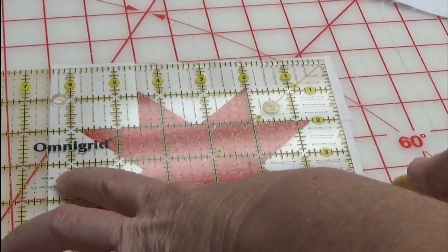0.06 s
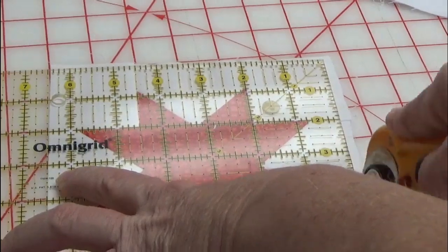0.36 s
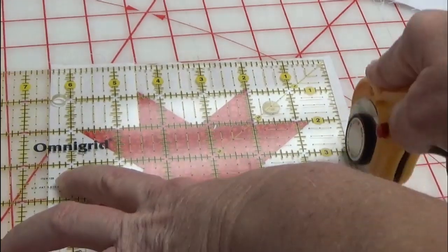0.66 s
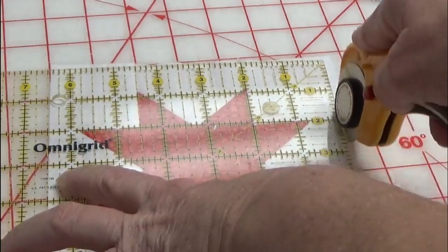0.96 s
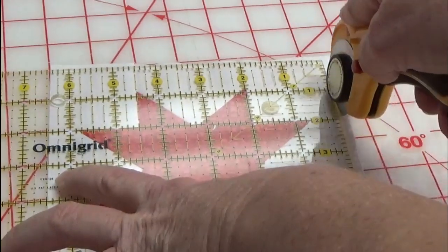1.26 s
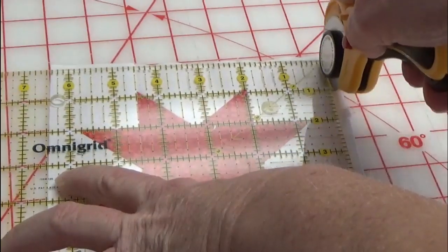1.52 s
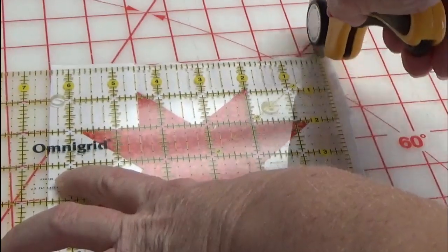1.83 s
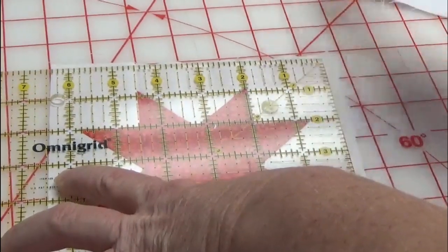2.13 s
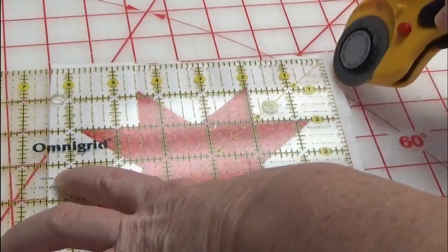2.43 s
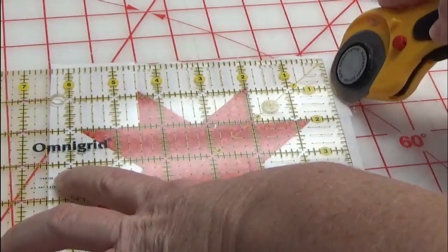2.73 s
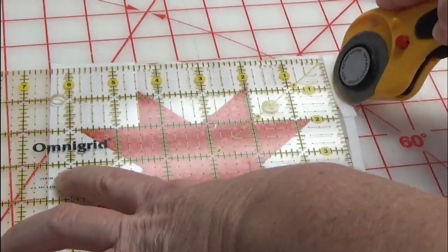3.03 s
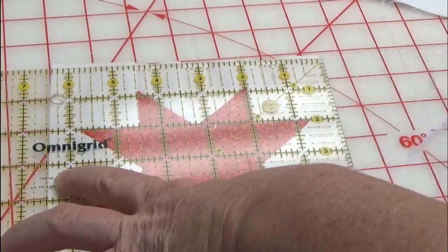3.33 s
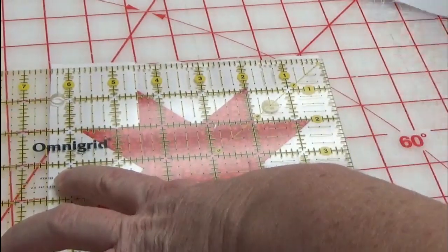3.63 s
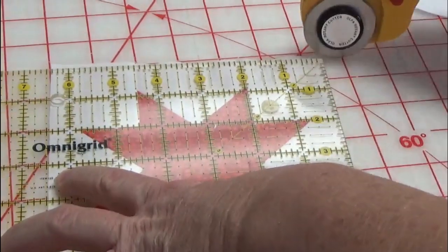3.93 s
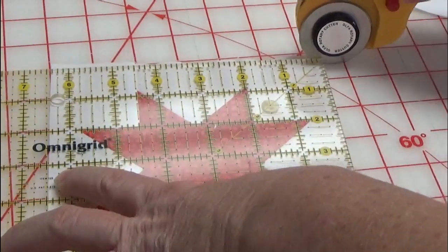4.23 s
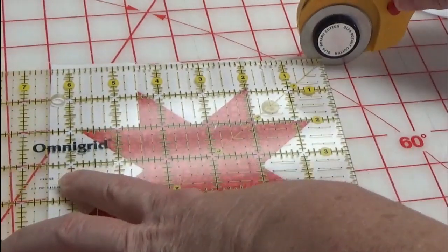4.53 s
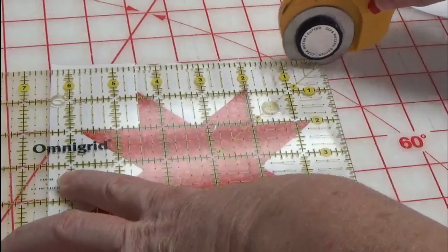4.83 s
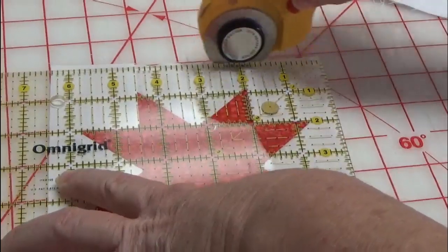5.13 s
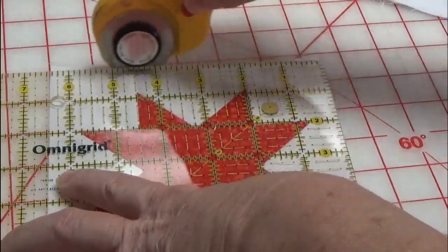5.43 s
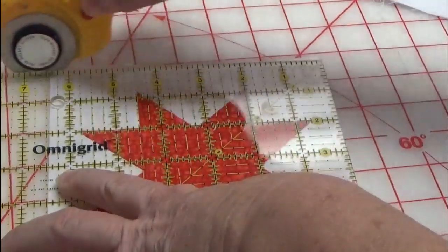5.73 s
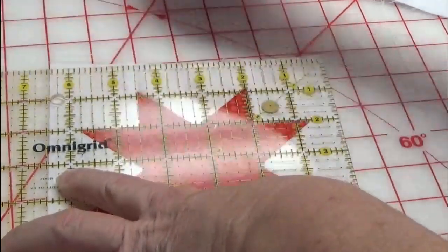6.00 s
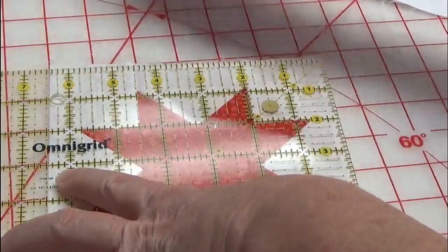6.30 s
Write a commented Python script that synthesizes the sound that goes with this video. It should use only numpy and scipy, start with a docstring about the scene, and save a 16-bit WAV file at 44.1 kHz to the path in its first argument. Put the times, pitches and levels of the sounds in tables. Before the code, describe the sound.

Close by in a quiet little room, a rolling blade makes short, crackly cuts through cloth on a mat and rolls out with a soft thud. The offcut rustles away, the cutter clicks once, and a focus motor ticks faintly in the gaps. A second, continuous cut follows with a few crisp snaps. It ends with the loudest sound, the plastic tool knocking and rattling as it is put down.

```python
"""A rotary cutter trims a quilt block along an acrylic ruler on a mat, in a small quiet room.
First the blade crunches up one side in short pushes, each breaking thread a tiny impulse, and rolls out.
A camera's focus motor ticks faintly in the pauses. The offcut is swept away with a rustle of friction,
the cutter ticks as it is turned, and a fingertip judders on the ruler. One long stroke runs along the top.
Last, the plastic cutter is put down with a clatter that excites the modes of handle and table."""
import sys
import numpy as np
from scipy import signal
from scipy.fft import rfft, irfft, next_fast_len
from scipy.io import wavfile

SR = 44100
rng = np.random.default_rng(int(sys.argv[2]) if len(sys.argv) > 2 else 0)


def store_pcm(level_fs):
    """Save levels as 16-bit WAV."""
    pcm = np.round(np.clip(level_fs, -1, 1) * 32767).astype(np.int16)
    wavfile.write(sys.argv[1], SR, np.atleast_2d(pcm).T)


N = 280476
TIME = np.arange(N) / SR
LEFT_RIGHT = np.array([[1], [-1]])
ATTACK_S, RELEASE_S = 0.031, 0.011  # rise and decay of a rubbing contact

# Levels are relative, before the mix. Spectrum of the room's noise, and its hum: f/Hz, level/dB
AIR_SPECTRUM = [(13, -45), (22, -4), (64, -6.5), (90, -2), (122, -10), (147, -2), (289, -2), (461, -4),
                (525, -8.5), (568, -5), (614, -8), (2080, -13.5), (2310, -14.5), (8480, -20.5),
                (11000, -25.5), (14300, -107), (22000, -120)]
HUM_PARTIALS = [(60, -76), (119, -73.5), (286, -72.5)]
# pushes of the blade: t/s, duration/s, level/dB, mat rumble/dB re crunch, stretch of the ruler
BLADE_PUSHES = [(-0.04, 0.023, -51, 1.5, "near"), (0.081, 0.081, -44, -6.5, "near"),
                (0.191, 0.078, -39.5, -7.5, "near"), (0.265, 0.095, -44.5, -12.5, "near"),
                (0.454, 0.07, -41.5, -3.5, "near"), (0.525, 0.45, -50, -2.5, "near"),
                (0.598, 0.15, -44, -4.5, "near"), (0.962, 0.043, -43, -1.5, "far"),
                (1.116, 0.083, -39.5, -5.5, "far"), (1.246, 0.16, -46.5, -3, "far"),
                (1.38, 0.26, -52, -6, "far"), (1.465, 0.086, -46.5, -3, "far"),
                (1.599, 0.13, -45.5, -6.5, "far"), (1.738, 0.065, -48, -2.5, "far"),
                (4.799, 0.11, -56, -0.5, "top"), (4.831, 0.15, -46.5, -6.5, "top"),
                (4.877, 0.12, -51, -3, "top"), (4.935, 0.22, -42.5, -2.5, "top"),
                (5.134, 0.31, -39.5, -3, "top"), (5.452, 0.079, -38, -17, "end"),
                (5.502, 0.27, -39, -6, "end")]
# thread bundles briefly change the load on the blade: t/s, gain/dB
THREAD_CATCHES = [(0.095, 5), (.223, -2), (0.329, 4), (0.46, 7), (0.487, 6.5), (0.716, 3.5), (0.83, 5),
                  (0.939, 4), (0.98, -3), (1.139, -3), (1.273, 1), (1.449, -1), (1.488, 4.5), (1.65, 6),
                  (1.717, 6), (4.962, 1), (5.038, 0), (5.296, 7)]
# spectra of the cut on each stretch: f/Hz, level/dB
NEAR_SPECTRUM = [(50, -38), (110, -28), (200, -3), (350, 2.5), (900, 4), (1600, 5), (2050, 2), (2600, -4),
                 (4300, -8), (5500, -15.5), (9300, -16.5), (11000, -26)]
FAR_SPECTRUM = [(50, -13), (110, -16), (200, -4.5), (320, -1.5), (560, -2.5), (900, 6.5), (1900, -2.5),
                (2700, -3), (4500, -9), (5800, -17), (9300, -14), (11000, -24)]
TOP_SPECTRUM = [(50, -52), (110, -26), (190, -6.5), (280, -1), (560, -11.5), (900, -6), (1600, 1.5),
                (2400, -6), (3600, -10.5), (6000, -14), (9500, -18), (11000, -24)]
# resonances of cutter, ruler and table on each stretch: f/Hz, bandwidth/Hz, gain/dB
NEAR_PEAKS = [(377, 31, 4), (498, 50, -15.5), (583, 74, 9), (652, 36, -17), (740, 75, 5), (980, 110, -2.5),
              (2340, 160, -2.5), (3170, 340, -10), (3550, 150, 6.5), (3590, 150, -4.5), (3920, 220, -5.5),
              (5000, 300, -4), (5770, 580, 2.5), (6900, 500, -4.5), (8300, 520, 2.5)]
FAR_PEAKS = [(273, 71, 1.5), (310, 42, 3.5), (380, 32.2, 3.5), (470, 19, 9), (830, 45, -10),
             (890, 140, 2.5), (1250, 120, -4), (1560, 110, 5), (2200, 360, 4), (3060, 300, -5.5),
             (5000, 1100, 3), (6520, 540, 6.5)]
TOP_PEAKS = [(263, 20, 2.5), (298, 32, 4), (321, 11, 2.5), (346, 42, -4), (460, 234, 12.5), (710, 78, 8.5),
             (900, 380, 10), (1030, 39, 0), (1350, 98, 2), (1486, 76, -8), (1870, 79, -6), (2050, 130, 2.5),
             (2820, 660, -2.5), (3150, 200, 5.5), (3580, 83, 3), (3870, 170, 4), (9700, 1400, 4)]
END_PEAKS = [(224, 92, 8), (325, 18, 16), (472, 32, 17), (665, 130, 10), (870, 190, 9.5), (1330, 110, 3.5),
             (1680, 87, -2), (1890, 150, -6.5), (3000, 360, 2), (4600, 130, 1), (6030, 380, -5),
             (6600, 250, 2)]
# the guard leans on the ruler: t/s, duration/s, first f/Hz, last f/Hz, level/dB re crunch
GUARD_GLIDES = [(0.09, 0.28, 1560, 1797, -6), (0.39, .36, 1790, 1960, -7), (0.94, 0.25, 1970, 1847, -7.5),
                (1.73, 0.066, 1680, 1680, -11), (5.08, .13, 2020, 2000, -5), (5.47, 0.4, 1530, 1500, -13)]
# blade and guard scrape ruler or mat: t/s, duration/s, f/Hz, bandwidth/Hz, level/dB
EDGE_SCRAPES = [(0.392, .05, 1820, 200, -58), (0.493, 0.038, 3930, 200, -41.5),
                (0.496, 0.046, 1842, 170, -39), (0.524, 0.0081, 1855, 168, -39),
                (0.616, 0.0044, 1900, 120, -35), (0.659, 0.034, 4720, 450, -49.5),
                (1.879, 0.03, 1230, 450, -51), (2.266, 0.013, 5300, 600, -60.5),
                (3.874, 0.0088, 2150, 200, -59), (3.874, .008, 3450, 400, -59),
                (5.4868, 0.0039, 1370, 299, -29), (5.507, 0.016, 1186, 700, -31),
                (5.509, 0.034, 4750, 900, -43)]
# seams and thick threads give way: t/s, level/dB
SEAM_SNAPS = [(0.484, -26.5), (0.661, -32), (1.717, -29.5), (5.257, -21), (5.484, -18.5), (5.748, -29)]
# the blade rolls on the bare mat: t/s, duration/s, level/dB
BARE_ROLLS = [(1.822, 0.71, -59.5), (5.845, 0.29, -61)]
# soft blows on the table: t/s, level/dB, damping by the hand/(dB/s)
TABLE_BLOWS = [(1.885, -37.5, 17), (2.066, -50, 60), (2.745, -45.5, 10), (4.085, -46.5, 110),
               (4.3936, -46, 100), (4.7603, -57, 60), (5.498, -36, 20), (6.151, -31, 10), (6.1671, -28, 8),
               (6.2972, -24.5, 8), (6.319, -33, 11)]
# the focus motor hunts: first t/s, last t/s, level/dB
MOTOR_RUNS = [(1.948, 3.03, -59.5), (3.917, 4.8, -60)]
# light contacts of blade and guard: t/s, level/dB, cutoff f/Hz
BLADE_TAPS = [(2.2634, -61, 9050), (4.2537, -25.5, 10900), (4.8546, -45, 8000)]
# blows on the handle: t/s, level/dB, cutoff f/Hz, clack/dB re shell, hollow/dB re shell, pitch ratio
HANDLE_BLOWS = [(2.75, -49, 8040, -2.5, -8, 1.05), (3.871, -51, 4500, -25, -15, 1),
                (4.223, -54, 3000, -25, 1, 1.07), (4.2263, -59, 3000, -15, 8, 1.12),
                (5.4986, -40, 1600, 7, -3, 1), (5.502, -33, 1700, -4, -5, .9),
                (5.5102, -34, 2000, 5, -2, 1), (5.859, -64, 597, 24, -12, .8),
                (5.865, -66, 500, 27, -12, .8), (5.8904, -36.5, 4470, -6, 7.5, 1),
                (5.9, -36, 4400, 0, -7, 1.1), (5.9428, -43.5, 7600, -13, -17, 1),
                (5.9756, -42, 6600, -10, -12, 0.96), (6.007, -42, 6900, -8, -10, 0.93),
                (6.045, -43, 5930, -10, -12, 0.92), (6.066, -45, 5000, -15, -2, 1),
                (6.1506, -26.5, 5500, 3, 1, 0.94), (6.1535, -25, 6500, 0, 3.5, 1.13),
                (6.2664, -15.5, 7900, -6.5, -8.5, 1.02), (6.2769, -24.5, 3000, -8, 4.5, 1.02),
                (6.282, -6, 6800, -22, -12.5, 0.99), (6.29, -19.5, 7060, -10, -8, 0.88)]
# normal modes of the struck bodies: f/Hz, level/dB, T60/s
TABLETOP_MODES = [(141.5, -10.5, 0.37), (190, -4.5, 0.22), (238.4, 1, 0.25), (292, 5, 0.1),
                  (319, -7.5, 0.12), (364, -4, 0.065), (468, -7.5, 0.2), (565, -11, 0.29), (704, -24, 0.18)]
CAMERA_MODES = [(1960, -11, 0.042), (2700, 10, 0.04), (3000, 2.5, 0.025), (3370, 6.5, 0.035)]
STEEL_MODES = [(1760, -13.5, 0.017), (2730, -11, 0.028), (4054, -5.5, 0.028), (5900, -8.5, 0.019),
               (7600, 3.5, 0.0024), (8060, 4, 0.0045), (10100, -0.5, 0.0038)]
SHELL_MODES = [(3150, 0.5, 0.005), (3190, -5.5, 0.02), (3457, -6.5, 0.021), (3900, 0.5, 0.0052),
               (4470, 5.5, 0.0049), (5250, -3.5, 0.015), (6120, 6, 0.0034), (8300, 2.5, 0.0027),
               (9050, 8.5, 0.0028)]
CAVITY_MODES = [(1407, -8.5, 0.034), (1574, -22, 0.097), (1612, 5.5, 0.023)]
SURFACE_MODES = [(295, -12, 0.031), (570, 0, 0.016), (800, 11.5, 0.0023), (1370, 9.5, 0.0023)]
# hand and cloth shift between strokes: t/s, duration/s, rub level/dB, hiss level/dB
HAND_MOVES = [(2.76, 0.072, -74, -63), (3.89, 0.044, -75, -59), (4.362, 0.12, -75, -71),
              (4.442, 0.39, -62, -78)]
# the offcut is pulled: t/s, duration/s, initial level/dB, growth/(dB/s)
OFFCUT_PULLS = [(3.068, 0.409, -53, 39), (3.413, 0.044, -36, 41)]
# the strip flaps as it tugs free: t/s, flutter gain/dB
STRIP_FLAPS = [(3.15, -1), (3.171, 2), (3.218, 6.5), (3.238, 7), (3.261, 6), (3.285, 7), (3.306, 7),
               (3.434, 4.5), (3.449, 6.5)]
# spectra of the offcut sliding slowly, sliding fast and fluttering: f/Hz, level/dB
DRAG_SPECTRUM = [(400, -16), (900, 6), (1300, -1.5), (1900, 6), (2400, 7), (2850, 4), (3600, 1.5),
                 (4400, 0), (5100, -5), (5600, -5.5), (7500, -3), (11000, -8.5)]
SWISH_SPECTRUM = [(400, -32), (800, 4), (1100, -2), (1700, -1), (2600, -2), (4200, -3.5), (7000, -4.5),
                  (11000, -14.5)]
FLUTTER_SPECTRUM = [(59, -58), (100, -38), (126, -10.5), (274, 3), (352, 0.5), (528, -6.5), (699, -6.5),
                    (869, -13.5), (1200, -23), (1560, -49), (2640, -120)]
# resonances of mat and table under the offcut: f/Hz, bandwidth/Hz, gain/dB
DRAG_PEAKS = [(1055, 84, 6), (1360, 200, 1), (2200, 200, -4), (3000, 130, -12), (3170, 130, 0),
              (3680, 200, 5), (4540, 200, 5), (5080, 220, -5), (5600, 290, 8), (7200, 250, 1)]
SWISH_PEAKS = [(1290, 110, 8), (1400, 81, -2), (1730, 140, 6), (2250, 220, 0.5), (3000, 160, -7),
               (3120, 110, 1), (3670, 160, 2), (4900, 570, -6), (5400, 250, 5.5), (6130, 260, 0),
               (7040, 180, 1), (7520, 260, -1), (8350, 400, 4)]
FLUTTER_PEAKS = [(278, 40, 1.5), (355, 22, -4), (390, 31, -2), (460, 40, 6.5), (520, 30, -6),
                 (592, 60, 6.5), (700, 70, 3)]
# a fingertip judders on the ruler: t/s, duration/s, f/Hz, level/dB
FINGER_SLIPS = [(4.535, 0.0093, 277, -44.5), (4.554, 0.014, 301, -51.5), (4.577, 0.023, 260, -52.5),
                (4.611, 0.0073, 283, -51), (4.645, 0.077, 283, -66)]
# reverberation time of the room: f/Hz, T60/s
REVERB_TIMES = [(150, 0.29), (500, 0.42), (2000, 0.32), (5000, 0.27), (11000, 0.27)]


def from_db(db):
    """Amplitude ratio of a level in decibels."""
    return 10 ** (np.asarray(db) / 20)


def rms_one(x):
    """Normalisation to unit power."""
    return x / np.sqrt(np.mean(x ** 2) + 1e-20)


def peak_one(x):
    """Normalisation to unit peak."""
    return x / np.abs(x).max()


def at_hz(points, hz):
    """Interpolation on a logarithmic frequency axis."""
    f, value = np.transpose(points)
    return np.interp(np.log(np.maximum(hz, 1)), np.log(f), value)


def cut(x, hz, kind, order=2):
    """Butterworth filter."""
    sections = signal.butter(order, np.clip(hz, 10, .45 * SR), kind, fs=SR, output="sos")
    return signal.sosfilt(sections, x + 1e-18)


def add(track, s, sound):
    """Superposition of a sound on a track at time s."""
    start = int(np.clip(round(s * SR), 0, N - 1))
    track[start:start + len(sound)] += sound[:N - start]


def envelope(start, length, attack_s=ATTACK_S, release_s=RELEASE_S):
    """Smooth onset, sustain and exponential decay."""
    since = TIME - start
    fading = np.clip((since - length) / release_s, 0, 30)
    return (.5 + .5 * np.tanh(2 * since / attack_s - 1)) * np.exp(-fading)


def drift(per_s):
    """Slow random fluctuation of unit power."""
    knots = rng.standard_normal(8000)
    return rms_one(np.interp(TIME * per_s, np.arange(len(knots)), knots))


def coloured(x, spectrum, resonances=()):
    """Source and filter: a broad spectrum with Lorentzian peaks and dips shapes x; unit power."""
    size = next_fast_len(N)
    hz = np.linspace(0, SR / 2, 12000)
    peaks_db = sum(lift / (1 + (2 * (hz - f) / width) ** 2) for f, width, lift in resonances)
    gain = np.interp(np.arange(size // 2 + 1) * SR / size, hz, from_db(at_hz(spectrum, hz) + peaks_db))
    return rms_one(irfft(rfft(x, size) * gain, size)[..., :N])


def grains(per_s, spread_db, smooth_db):
    """Shot noise: random impulses of uneven size over smooth friction; unit power."""
    when, size, sign = rng.random((48000, 3))[:max(int(per_s * N / SR), 1)].T
    heights = from_db(spread_db * np.minimum(-np.log(1 - size), 4)) * np.sign(sign - .5)
    impulses = rms_one(np.bincount((when * N).astype(int), heights, N))
    return rms_one(impulses + from_db(smooth_db) * rng.standard_normal(N))


def travelling(x, echo_db=-13, shifts_per_s=7):
    """Comb filtering: treble echoes in ruler and mat wax and wane as the contact moves along."""
    lags = (np.geomspace(0.000902, .0065, 9) * SR).astype(int)
    treble = cut(x, 1800, "high")
    echoes = sum(drift(shifts_per_s) * np.roll(treble, lag) for lag in lags)
    return rms_one(x + from_db(echo_db) * echoes)


def strike(modes, vary_db, rattle_db, rattle_s, flip=-1, pitch=1):
    """Impact response: damped modes convolved with a click and a brief rattle of the contact."""
    t = TIME[:SR // 2]
    ring = np.zeros(len(t))
    for k, (hz, db, t60) in enumerate(modes):
        decay = from_db(db + vary_db * rng.standard_normal() - 60 * t / t60)
        ring += flip ** k * decay * np.sin(2 * np.pi * pitch * hz * t)
    contact = from_db(rattle_db) * rng.standard_normal(len(t)) * np.exp(-t / rattle_s)
    contact[0] = 1
    return signal.fftconvolve(ring, contact)[:len(t)] / np.abs(ring).max()


def room_tone(air_db=-61.54, side_db=-11):
    """Stationary background: broadband hiss and rumble, with hum partials of wandering phase."""
    mid, side = coloured(rng.standard_normal((2, N)), AIR_SPECTRUM)
    side = from_db(side_db) * (side - 0.03 * cut(side, 300, "low", order=1))
    hum = sum(from_db(db) * np.sqrt(2) * np.sin(2 * np.pi * hz * TIME + 1.77 * drift(9.1))
              for hz, db in HUM_PARTIALS)
    return from_db(air_db) * (mid + side * LEFT_RIGHT) + hum


def blade_contact(weave_db=0.72, hand_db=0.03, catch_s=0.0031):
    """Fracture noise: crushing and snapping, amplitude-modulated by the weave and the hand's pressure."""
    half_s = catch_s / 2
    caught_db = sum(db * envelope(s - half_s, catch_s, half_s, half_s) for s, db in THREAD_CATCHES)
    load = from_db(weave_db * drift(130) + hand_db * drift(40) + caught_db)
    crushing = travelling(grains(per_s=2600, spread_db=2.5, smooth_db=-4.5))
    snapping = travelling(grains(per_s=1800, spread_db=4.0, smooth_db=0.0))
    return load * crushing, load * snapping


def rolling_blade(stretch, contact, guard, spectrum, resonances, crackle_db, coast_s):
    """Forced vibration: the mat rumbles, the weave crunches, threads crackle; pushes add in power."""
    rumble_hz, crackle_hz = 450, 2800
    body, threads = (coloured(source, spectrum, resonances) for source in contact)
    strength, ring = guard
    rumble = rms_one(cut(body, rumble_hz, "low", order=5))
    crunch = rms_one(cut(body, [rumble_hz, crackle_hz], "band", order=5))
    crunch = (crunch + strength * ring) / np.hypot(1, strength)
    crackle = rms_one(cut(threads, crackle_hz, "high", order=5))
    crunch_power, crackle_power, rumble_power = np.zeros((3, N))
    for s, length, db, rumble_db, where in BLADE_PUSHES:
        if where == stretch:
            crunch_power += (from_db(db) * envelope(s, length, release_s=coast_s)) ** 2
            crackle_power += (from_db(db + crackle_db) * envelope(s, length, release_s=0.026)) ** 2
            rumble_power += (from_db(db + rumble_db) * envelope(s, length, release_s=0.041)) ** 2
    return (np.sqrt(crunch_power) * crunch + np.sqrt(crackle_power) * crackle
            + np.sqrt(rumble_power) * rumble)


def narrow_ring(hz, width_hz):
    """Narrowband noise of a friction-driven resonance, centred on hz at each sample; unit power."""
    in_phase, quadrature = cut(rng.standard_normal((2, len(hz))), width_hz / 2, "low")
    phase = 2 * np.pi * np.cumsum(hz) / SR
    return rms_one(in_phase * np.cos(phase) + quadrature * np.sin(phase))


def guard_ring():
    """Friction on the ruler drives the guard's resonance, which glides as the cutter tilts."""
    glide = [point for s, length, first, last, _ in GUARD_GLIDES
             for point in ((s, first), (s + length, last))]
    hz = np.interp(TIME, *np.transpose(glide))
    strength = sum(from_db(db) * envelope(s, length, attack_s=0.022, release_s=0.014)
                   for s, length, _, _, db in GUARD_GLIDES)
    return strength, narrow_ring(hz, width_hz=140)


def scrapes():
    """Sliding friction drives one resonance under a short Gaussian swell."""
    out, t = np.zeros(N), TIME[:SR // 4] - 1 / 8
    for s, length, hz, width_hz, db in EDGE_SCRAPES:
        swell = np.exp(-(2 * t / length) ** 2)
        ring = cut(narrow_ring(np.full(len(t), hz), width_hz), hz / 2, "high") * swell
        add(out, s + t[0], from_db(db) * ring * np.linalg.norm(swell) / np.linalg.norm(ring))
    return out


def seam_snaps(decay_s=0.00086):
    """Sudden fracture of a thick thread or seam radiates a dry, bright noise burst."""
    out, t = np.zeros(N), TIME[:SR // 20]
    for s, db in SEAM_SNAPS:
        burst = rng.standard_normal(len(t)) * np.exp(-t / decay_s)
        add(out, s, from_db(db) * peak_one(cut(burst, [2800, 10000], "band", order=1)))
    return out


def run_outs(rumble_db=3, hiss_db=1.5, fade_db_per_s=23.5):
    """Rolling noise: on the bare mat the blade only rumbles and hisses, fading as it slows."""
    body = coloured(grains(per_s=910, spread_db=-1.0, smooth_db=-22), FAR_SPECTRUM, FAR_PEAKS)
    rumble = from_db(rumble_db) * rms_one(cut(body, 450, "low", order=4))
    hiss = from_db(hiss_db) * rms_one(cut(body, 2800, "high", order=4))
    slowing = sum(from_db(db - fade_db_per_s * np.maximum(TIME - s, 0)) * envelope(s, length)
                  for s, length, db in BARE_ROLLS)
    return slowing * (body + rumble + hiss)


def table_thuds():
    """Soft impacts of hand and tool start the table's low modes in phase; they beat as they decay."""
    out = np.zeros(N)
    for s, db, damping_db_per_s in TABLE_BLOWS:
        ring = strike(TABLETOP_MODES, vary_db=0.7, rattle_db=-35.5, rattle_s=0.018, flip=1)
        damped = ring * from_db(-damping_db_per_s * TIME[:len(ring)])
        thud = cut(cut(damped, 700, "low"), 125, "high", order=4)
        add(out, s, from_db(db) * peak_one(thud))
    return out


def focus_motor(steps_per_s=30):
    """Periodic impacts: each tiny step of the lens excites the modes of the camera's body."""
    out = np.zeros(N)
    for start, end, db in MOTOR_RUNS:
        for s in np.arange(start, end, 1 / steps_per_s):
            gain = from_db(db + rng.normal(0, 1))
            ring = strike(CAMERA_MODES, vary_db=3.5, rattle_db=-17, rattle_s=0.0025)
            add(out, s, gain * peak_one(ring))
    return out


def blade_ticks():
    """Free vibration of the steel blade after small, hard contacts."""
    out = np.zeros(N)
    for s, db, cutoff_hz in BLADE_TAPS:
        ring = strike(STEEL_MODES, vary_db=1.0, rattle_db=-21, rattle_s=.0012)
        add(out, s, from_db(db) * peak_one(cut(ring, cutoff_hz, "low")))
    return out


def handle_knocks(crack_db=-12, crack_s=0.003, clatter_db=-28, clatter_s=0.086):
    """A hard impact excites the handle's shell, its cavity and the surface, while loose parts clatter."""
    out, t = np.zeros(N), TIME[:SR // 2]
    decay = from_db(crack_db) * np.exp(-t / crack_s) + from_db(clatter_db) * np.exp(-t / clatter_s)
    for s, db, cutoff_hz, clack_db, hollow_db, pitch in HANDLE_BLOWS:
        clatter = cut(rng.standard_normal(len(t)) * decay, 890, "high")
        shell = strike(SHELL_MODES, vary_db=1.5, rattle_db=-18, rattle_s=0.00086, pitch=pitch)
        shell = cut(peak_one(shell) + clatter, 360, "high")
        hollow = strike(CAVITY_MODES, vary_db=7.0, rattle_db=-21, rattle_s=0.0017, pitch=pitch)
        clack = cut(strike(SURFACE_MODES, vary_db=3, rattle_db=-17, rattle_s=0.0018), 170, "high")
        for part, part_db in ((shell, 0), (hollow, hollow_db), (clack, clack_db)):
            add(out, s, from_db(db + part_db) * peak_one(cut(part, cutoff_hz, "low")))
    return out


def hand_shifts(uneven_db=3.8):
    """Friction noise in two bands: the palm rubs dully on the ruler and the cloth hisses."""
    rub = rms_one(cut(grains(per_s=1200, spread_db=1.5, smooth_db=-3), [240, 620], "band"))
    hiss = rms_one(cut(grains(per_s=400, spread_db=2.5, smooth_db=-4), 4000, "high"))
    moves = sum(envelope(s, length) * (from_db(rub_db) * rub + from_db(hiss_db) * hiss)
                for s, length, rub_db, hiss_db in HAND_MOVES)
    return from_db(uneven_db * drift(25)) * moves


def offcut(free_s=3.238, whisk_s=3.33, lift_off_s=3.458, flutter_db=-11.0):
    """Sliding friction changes colour with speed: the strip drags, flaps free, then swishes away."""
    pull_power = np.zeros(N)
    for s, length, db, growth in OFFCUT_PULLS:
        gain = from_db(db + growth * np.clip(TIME - s, 0, length))
        pull_power += (gain * envelope(s, length, attack_s=0.042, release_s=0.0089)) ** 2
    speed = .5 + .5 * np.tanh((TIME - whisk_s) / 0.044)
    drag = travelling(grains(per_s=2000, spread_db=3.5, smooth_db=-7.0))
    drag = coloured(drag, DRAG_SPECTRUM, DRAG_PEAKS)
    swish = coloured(grains(per_s=6400, spread_db=2.5, smooth_db=-9), SWISH_SPECTRUM, SWISH_PEAKS)
    flutter = grains(per_s=780, spread_db=7.0, smooth_db=4.0) * from_db(0.88 * drift(90))
    flutter = coloured(flutter, FLUTTER_SPECTRUM, FLUTTER_PEAKS)
    freeing_db = 12.0 * np.exp(-((TIME - free_s) / 0.16) ** 2)
    flaps_db = sum(db * np.exp(-((TIME - s) / 0.0076) ** 2) for s, db in STRIP_FLAPS)
    lifted_db = -400 * np.maximum(TIME - lift_off_s, 0)  # off the mat, the flutter stops
    flutter *= from_db(flutter_db + freeing_db + flaps_db + lifted_db)
    return np.sqrt(pull_power) * (np.sqrt(1 - speed) * drag + np.sqrt(speed) * swish + flutter)


def finger_judders():
    """Stick-slip oscillation of skin on acrylic: a few cycles of a low, nearly pure groan."""
    out = np.zeros(N)
    for s, length, hz, db in FINGER_SLIPS:
        swell = np.exp(-(2 * (TIME - s) / length) ** 2)
        out += from_db(db) * np.sqrt(2) * swell * np.sin(2 * np.pi * hz * (TIME - s))
    return out


def room_response(side_db=-2.0, build_s=0.001, coherent_below_hz=780):
    """A diffuse field decays band by band; long waves arrive alike at left and right."""
    t = TIME[:SR // 2]
    edges = np.geomspace(90, 14000, 8)
    field = np.zeros((2, len(t)))
    for low, high in zip(edges, edges[1:]):
        t60 = at_hz(REVERB_TIMES, np.sqrt(low * high))
        field += cut(rng.standard_normal(field.shape), [low, high], "band") * from_db(-60 * t / t60)
    mid, side = field
    side = from_db(side_db) * cut(side, coherent_below_hz, "high")
    return rms_one((mid + side * LEFT_RIGHT) * (1 - np.exp(-t / build_s))) / np.sqrt(len(t))


def reverberation(x, room):
    """Convolution with the room's stereo impulse response."""
    return signal.fftconvolve(x[None], room, axes=1)[:, :N]


def placed(x, room, wet_db, pan_db):
    """A source at rest: direct sound plus the reverberant field."""
    return x * from_db(LEFT_RIGHT * pan_db / 2) + from_db(wet_db) * reverberation(x, room)


def moving(x, rooms, wet_db, pan_db):
    """A moving source: its patterns of reflections blend at random with constant total power."""
    shares = np.array([drift(per_s=3) for _ in rooms])
    shares /= np.linalg.norm(shares, axis=0)
    wet = sum(reverberation(share * x, room) for share, room in zip(shares, rooms))
    return x * from_db(LEFT_RIGHT * pan_db / 2) + from_db(wet_db) * wet


def scene():
    """Superposition of the sources on the table, their reflections and the background."""
    room, guard, contact = room_response(), guard_ring(), blade_contact()
    rooms = [room, room_response(), room_response()]
    cutting = (
        rolling_blade("near", contact, guard, NEAR_SPECTRUM, NEAR_PEAKS, crackle_db=-4.0, coast_s=0.031)
        + rolling_blade("far", contact, guard, FAR_SPECTRUM, FAR_PEAKS, crackle_db=-3.5, coast_s=0.024)
        + rolling_blade("top", contact, guard, TOP_SPECTRUM, TOP_PEAKS, crackle_db=-4.5, coast_s=0.015)
        + rolling_blade("end", contact, guard, TOP_SPECTRUM, END_PEAKS, crackle_db=-5.0, coast_s=0.025)
        + run_outs() + hand_shifts() + scrapes() + seam_snaps())
    return (from_db(-1.97) * moving(cutting, rooms, wet_db=-9.0, pan_db=1.3)
            + from_db(-2.06) * moving(offcut(), rooms, wet_db=-9.0, pan_db=0.8)
            + placed(blade_ticks(), room, wet_db=-17, pan_db=2.0)
            + placed(handle_knocks(), room, wet_db=-12.5, pan_db=1.7)
            + placed(table_thuds() + finger_judders(), room, wet_db=-5.0, pan_db=0.7)
            + focus_motor() + room_tone())


def record(dry):
    """Band limiting: a steep low-pass lets only a faint trace of the highest treble through."""
    cutoff_hz, leak_top_hz, leak_db = 10980, 14800, -36.5
    passed = signal.sosfilt(signal.ellip(10, .2, 70, cutoff_hz, fs=SR, output="sos"), dry)
    leak = from_db(leak_db) * cut(dry, cutoff_hz, "high", order=4)
    return signal.sosfilt(signal.ellip(8, .1, 70, leak_top_hz, fs=SR, output="sos"), passed + leak)


dry = scene()
out = record(dry)
store_pcm(out)
```